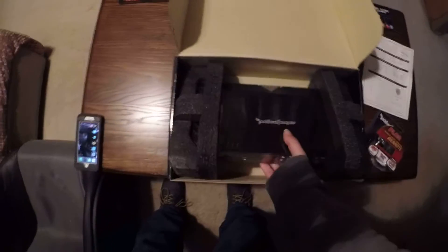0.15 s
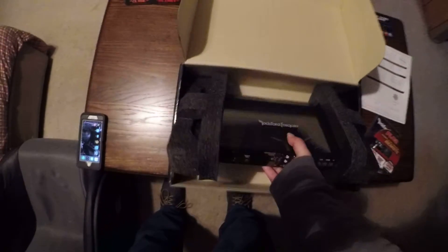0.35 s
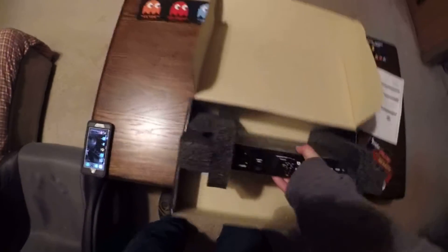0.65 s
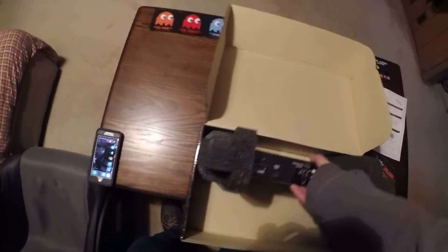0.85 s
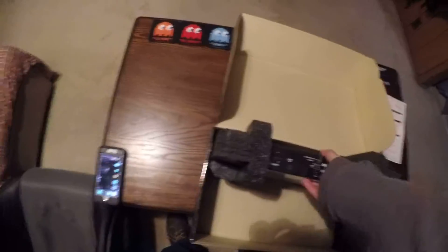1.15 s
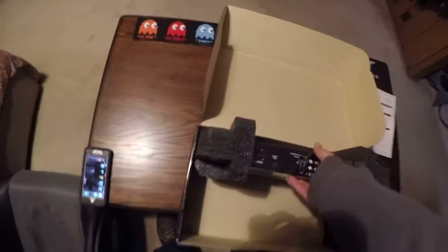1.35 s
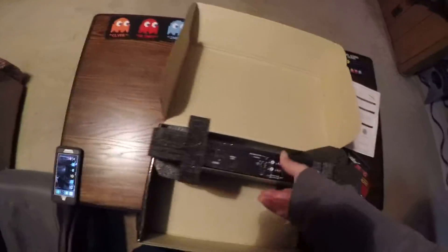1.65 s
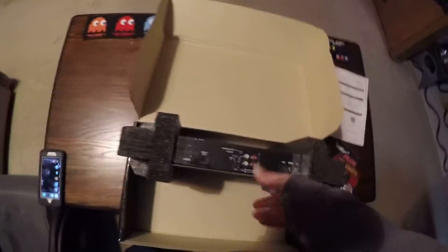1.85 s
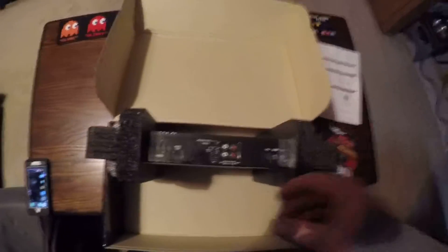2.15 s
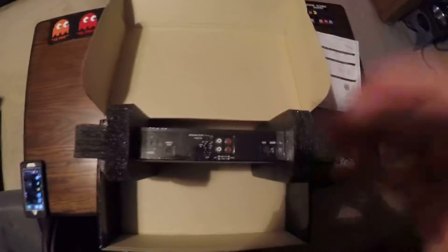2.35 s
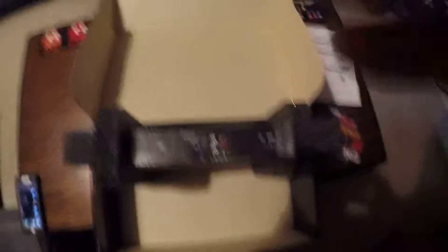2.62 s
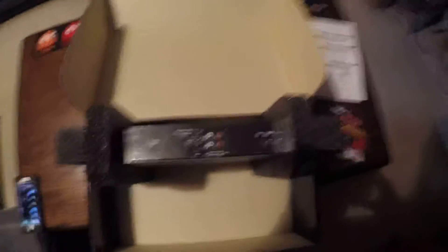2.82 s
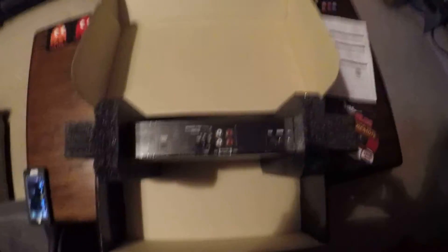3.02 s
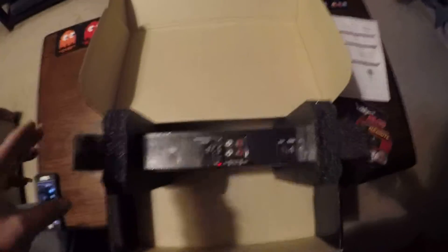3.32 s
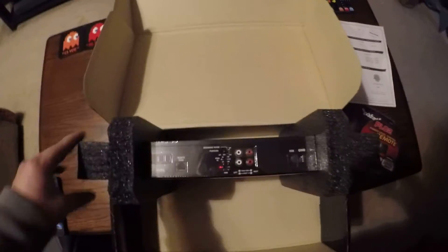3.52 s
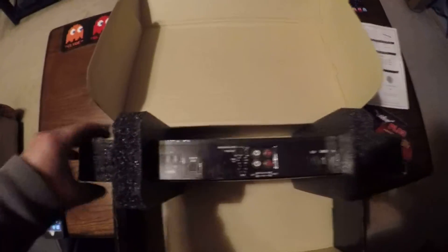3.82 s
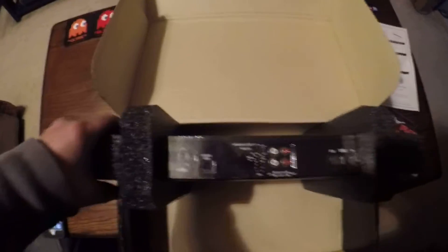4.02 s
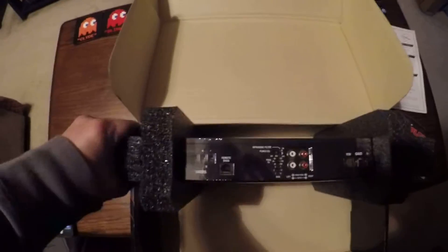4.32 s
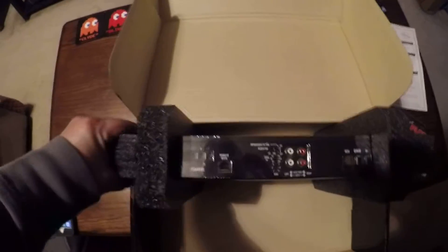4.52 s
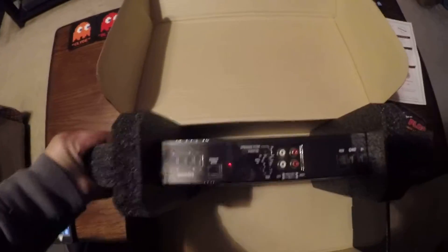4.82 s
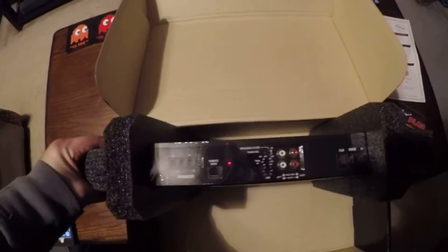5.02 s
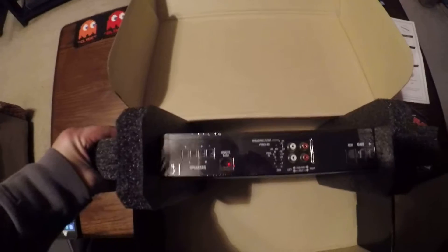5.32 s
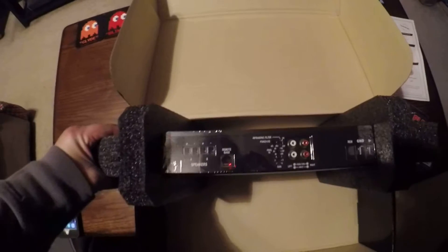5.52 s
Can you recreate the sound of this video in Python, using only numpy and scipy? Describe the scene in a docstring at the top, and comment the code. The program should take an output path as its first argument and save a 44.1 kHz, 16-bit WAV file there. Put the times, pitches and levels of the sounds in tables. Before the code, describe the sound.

Foam scrapes along a cardboard box, a heavy unit lands with dull thuds, loud knocks hit the camera, then foam softly crackles.

```python
"""A heavy metal unit in foam end caps is dragged out of a cardboard box and set down across its rim:
stick-slip trains, coloured as foam rub and resonated as cardboard panel, then thuds on box modes.
A hand adjusts the head-worn camera: skin slips on the case, each knock is a click, a push and a sway.
Then it slides over and grips one foam cap: fine grain, coarse crackle, single cells snapping.
Shaped noise makes the low rumble of a quiet room and the microphone hiss."""
import sys
import numpy as np
from scipy import signal
from scipy.fft import rfft, irfft
from scipy.io import wavfile
from scipy.ndimage import uniform_filter1d

SR = 44100
rng = np.random.default_rng(int(sys.argv[2]) if len(sys.argv) > 2 else 0)


def transcribe(signal):
    """Save signal, clipped to [-1, 1], as a 16-bit WAV file at the path in sys.argv[1]."""
    frames = np.atleast_2d(signal).T
    limited = np.clip(frames, -1, 1)
    pcm = np.round(limited * 32767).astype(np.int16)
    wavfile.write(sys.argv[1], SR, pcm)


N = 249768
TIME = np.arange(N) / SR

# squeezed foam spectrum: (frequency [Hz], relative density [dB])
GRIP_COLOUR = [(380, -53), (650, -19), (711, -14), (919, -9), (1420, -14.5), (1660, -10.5), (1840, -17),
               (2920, -6.5), (3880, -13.5), (5700, -7.5), (6910, -17.5), (10000, -23), (11400, -39),
               (14000, -45)]
# fingers knock the camera: (time [s], sway peak [dB], sway frequency [Hz], sway rise [s],
# push peak [dB], case click peak [dB])
KNOCKS = [(2.6065, -4.5, 49.3, 0.014, -20, -19.5), (2.696, -14, 42.3, .0023, -26, -27),
          (2.784, -11.5, 42.4, 0.014, -27, -45), (2.8135, -9.5, 49.4, 0.0034, -16.5, -45),
          (2.8455, -5, 56.7, 0.0041, -8.5, -26), (2.946, -7.5, 67, 0.0019, -18.5, -25),
          (3.0936, -7.5, 58.7, 0.0028, -15, -4), (3.129, -7, 49.5, 0.0029, -5.5, 0)]


def amp(db):
    """Decibels to gain."""
    return 10 ** (np.asarray(db) / 20)


def unit(x):
    """Scales to rms 1."""
    return x / np.sqrt(np.mean(x ** 2) + 1e-20)


def peaked(x):
    """Scales to peak 1."""
    return x / (abs(x).max() + 1e-20)


def level(rows, column=1):
    """Gain over time from one dB column of a curve, silent outside it."""
    columns = np.transpose(rows)
    return amp(np.interp(TIME, columns[0], columns[column], left=-120, right=-120))


def stroke(start_s, fastest_s, end_s, shape):
    """Gain over time of one rubbing movement: it gathers speed, then slows to rest."""
    speed = np.interp(TIME, [start_s, fastest_s, end_s], [0, 1, 0])
    return np.sin(np.pi / 2 * speed) ** shape


def swells(rows, shape):
    """Gain over time of even strokes (middle [s], length [s], level [dB]), added in power."""
    power = np.zeros(N)
    for middle_s, length_s, db in rows:
        gain = stroke(middle_s - length_s / 2, middle_s, middle_s + length_s / 2, shape)
        power += (amp(db) * gain) ** 2
    return np.sqrt(power)


def add(mix, start_s, sound):
    """Mixes a sound in at start_s."""
    part = mix[max(round(start_s * SR), 0):][:len(sound)]
    part += sound[:len(part)]


def colour(x, points):
    """Filters by a spectrum of (frequency [Hz], gain [dB]) points, joined on a log-frequency axis."""
    hz, db = np.transpose(points)
    bins_hz = np.fft.rfftfreq(len(x), 1 / SR)
    gain_db = np.interp(np.log(bins_hz + 1), np.log(hz + 1), db)
    return irfft(rfft(x) * amp(gain_db), len(x))


def resonate(x, modes):
    """Sum of steep resonances (frequency [Hz], half-width at -6 dB [Hz], gain [dB])."""
    out = np.zeros(len(x))
    for k, (hz, width_hz, db) in enumerate(modes):
        b, a = signal.iirpeak(hz, hz / (2 * width_hz), SR)
        twice = signal.lfilter(b, a, signal.lfilter(b, a, x))
        out += (-1) ** k * amp(db) * twice  # neighbours move in opposite directions
    return out


def struck(modes, t):
    """Sum of decaying sines (frequency [Hz], level [dB], t60 [s])."""
    return sum(amp(db - 60 * t / t60_s) * np.sin(2 * np.pi * hz * t) for hz, db, t60_s in modes)


def wander(rate_hz):
    """Slow random motion of rms 1: noise under a Gaussian low-pass."""
    bins_hz = np.fft.rfftfreq(N, 1 / SR)
    spectrum = rfft(rng.standard_normal(N)) * np.exp(-(bins_hz / rate_hz) ** 2)
    return unit(irfft(spectrum, N))


def slips(per_s, spread_db):
    """A train of tiny stick-slip releases of even mean power, a few much larger than the rest."""
    size = amp(spread_db * np.minimum(rng.exponential(1, N), 4))
    fires = rng.random(N) < per_s / SR
    train = rng.choice([-1, 1], N) * size * fires
    power = abs(uniform_filter1d(train ** 2, size=2000))
    return train / np.sqrt(power + 1e-6)


def rubbing(per_s, spread_db, judder_db, judder_hz):
    """Stick-slip friction whose level judders at random (judder_db rms)."""
    return slips(per_s, spread_db) * amp(judder_db * wander(judder_hz))


def drag(rub_trim_db=1.0, panel_trim_db=1.0, scuff_panel_db=1.5):
    """Foam cells catch and let go on the box wall; the same slips shake the cardboard panel."""
    # one long pull along the wall: (time [s], rub level [dB], panel level [dB]), before the trims
    pull = [(0.0, -45.5, -44.5), (0.124, -33, -39.5), (0.276, -42, -39.5), (0.346, -42, -38),
            (0.458, -33.5, -35.5), (0.564, -39.5, -37.5), (0.622, -35.5, -39), (0.746, -41, -41.5),
            (0.76, -43.5, -41), (0.81, -52.5, -55)]
    # once clear, the foam brushes the box: (middle [s], length [s], rub level [dB])
    short_scuffs = [(.832, .075, -41.5), (.895, 0.1, -44), (.96, .16, -52.5), (1.017, 0.055, -45),
                    (1.07, 0.11, -52.5), (1.19, 0.23, -58)]
    # foam rub spectrum: (frequency [Hz], relative density [dB])
    rub_colour = [(1120, -11.5), (1900, -7), (2110, -0.5), (2320, -4.5), (2730, -1), (4140, -8.5),
                  (4750, -2.5), (5500, -3.5), (5850, -5.5), (6770, -18.5), (7380, -17), (9740, -20.5),
                  (14000, -44.5), (15000, -45)]
    # rubbed cardboard: (frequency [Hz], half-width at -6 dB [Hz], relative gain [dB])
    panel_modes = [(124, 71, -5), (257, 135, 1), (412, 51, 2.5), (700, 150, 2), (900, 91, -8.5),
                   (1205, 227, 6), (1317, 215, -0.5), (1790, 100, -39)]
    friction = rubbing(per_s=9000, spread_db=1.5, judder_db=0.73, judder_hz=100)
    scuffs = swells(short_scuffs, shape=1.26)
    rub_gain = level(pull, column=1) * amp(rub_trim_db) + scuffs
    panel_gain = level(pull, column=2) * amp(panel_trim_db) + scuffs * amp(scuff_panel_db)
    rub = unit(colour(friction, rub_colour)) * rub_gain
    panel = unit(resonate(friction, panel_modes)) * panel_gain
    return rub + panel


def background(rumble_db=-33, swell_db=1.04, hiss_db=-61):
    """Low room rumble that swells a little, and steady microphone hiss."""
    # room rumble: (frequency [Hz], relative density [dB])
    rumble_colour = [(8.8, -9.5), (15, -2), (39, 1.5), (60, -6.5), (161, -20.5), (334, -25.5), (397, -25),
                     (491, -32.5), (524, -31.5), (692, -35), (934, -40), (1210, -41), (2500, -47.5),
                     (3250, -90), (5500, -120)]
    # microphone hiss: (frequency [Hz], relative density [dB])
    hiss_colour = [(1350, -44), (2300, -13), (2470, 0), (2690, 2.5), (3000, -0.5), (3080, 2.5), (3410, -3),
                   (3680, -4), (4310, -4), (5810, 0.5), (6590, 2), (7960, 2.5), (10700, -3), (15000, -22.5)]
    rumble = unit(colour(rng.standard_normal(N), rumble_colour))
    rumble = rumble * amp(swell_db * wander(rate_hz=17.0))
    hiss = unit(colour(rng.standard_normal(N), hiss_colour))
    return amp(rumble_db) * rumble + amp(hiss_db) * hiss


def landings(flap_db=-15, flap_s=0.013, scuff_db=-29, scuff_s=0.0025, damping_db_per_s=260):
    """Cushioned blows ring the box and flap its loose walls; each starts with a small scuff of foam."""
    # the unit lands on the rim: (time [s], thud peak [dB], contact time [s])
    blows = [(.949, -14.5, 0.003), (.957, -16, 0.0025), (0.9837, -12, 0.0019), (1.002, -21, 0.007),
             (1.012, -21.5, 0.0013)]
    # loaded box: (frequency [Hz], relative level [dB], t60 before the foam's damping [s])
    box_modes = [(98, -0.5, 0.32), (130, -9, 0.13), (164, -1.5, 0.14), (200.6, 4, 0.071), (304, -7, 0.097),
                 (417, 2.5, 0.23), (654, 3, 0.04), (730, -1, 0.017), (920, -13, .04)]
    flap_colour = [(40, -14), (120, 5), (400, -2), (800, -8), (1300, -32), (6000, -78)]
    scuff_colour = [(500, 6), (5000, -2), (10000, 2), (11000, -18), (15000, -33)]
    out, t = np.zeros(N), np.arange(SR // 2) / SR
    ring = struck(box_modes, t) * amp(-damping_db_per_s * t)  # the resting foam damps the box
    noises = rng.standard_normal((len(blows), len(t)))
    for (start_s, db, contact_s), noise in zip(blows, noises):
        push = t * np.exp(-2 * np.pi * t / contact_s)
        thud = peaked(signal.fftconvolve(push, ring)[:len(t)])
        flap = unit(colour(noise, flap_colour)) * np.exp(-t / flap_s)
        flap = flap * (1 - np.exp(-2 * t / contact_s))
        scuff = unit(colour(noise, scuff_colour)) * np.exp(-t / scuff_s)
        add(out, start_s, amp(db) * (thud + amp(flap_db) * flap + amp(scuff_db) * scuff))
    return out


def snaps(settle_s=0.0022, settle_db=-17, ring_width_hz=1800, ring_db=-2):
    """A cell wall buckles: a sharp release, its neighbours settling, rung at the cell's own pitch."""
    # loudest foam cells: (time [s], peak [dB], pitch [Hz])
    loud_cells = [(1.3274, -37, 5240), (1.5385, -29, 5800), (4.4939, -19, 3840), (4.5329, -26, 3430),
                  (4.669, -24, 4500), (4.7475, -27, 3050), (4.7906, -30, 5540), (4.8265, -22.5, 3100),
                  (4.858, -22, 5200), (4.906, -20, 3200), (4.970, -25.5, 4340), (5.058, -16.5, 5950),
                  (5.080, -17.5, 3000), (5.096, -21.5, 5900), (5.164, -24, 3030), (5.460, -32.5, 5100)]
    out, t = np.zeros(N), np.arange(-256, 1536) / SR
    cells = list(loud_cells) + ticks()
    noises = rng.standard_normal((len(cells), len(t)))
    for (snap_s, db, hz), noise in zip(cells, noises):
        settling = (t > 0) * amp(settle_db) * noise * np.exp(-abs(t) / settle_s)
        crack = colour((t == 0) + settling, GRIP_COLOUR)
        rung = crack + resonate(crack, [(hz, ring_width_hz, ring_db)])
        add(out, snap_s + t[0], amp(db) * peaked(rung))
    return out


def fingers(skid_rise_s=0.01, skid_fall_s=0.0027, skid_case_db=-17.5, skid_skin_db=-32.5, skid_growth=1.5):
    """Skin slips on the camera case, heard through the plastic: long strokes, a skid into each knock."""
    # strokes: (start [s], fastest [s], end [s], case level [dB], skin hiss level [dB]);
    # a row that ends before it starts is silent
    strokes = [(2.602, 2.614, 2.684, -32.5, -40), (2.675, 2.721, 2.836, -28.5, -37),
               (2.714, 2.75, 2.795, -23, -55), (2.77, 2.81, 2.825, -37.5, -49.5),
               (2.842, 2.848, 2.872, -35, -46.5), (2.853, 2.904, 2.964, -35, -47.5),
               (2.934, 2.949, 2.972, -38.5, -48.5), (2.955, 3.085, 2.9, -44, -55.5)]
    # camera case: (frequency [Hz], half-width at -6 dB [Hz], relative gain [dB])
    case_resonances = [(202, 203, 2.5), (470, 210, -1), (720, 256, 1.5), (1125, 123, 5.5), (1240, 193, 5.5),
                       (1660, 450, -4.5), (1996, 350, -4.5)]
    # skin hiss: (frequency [Hz], relative density [dB])
    skin_colour = [(1410, -7), (2400, 7), (2760, 7.5), (3240, 7), (4170, 1.5), (6070, 2.5), (7300, -6),
                   (9760, -10.5), (15000, -41)]
    friction = rubbing(per_s=4100, spread_db=1.0, judder_db=1.5, judder_hz=66)
    case_gain, skin_gain = np.zeros(N), np.zeros(N)
    for start_s, fastest_s, end_s, case_db, skin_db in strokes:
        speed = stroke(start_s, fastest_s, end_s, shape=2.26)
        case_gain = np.hypot(case_gain, amp(case_db) * speed)
        skin_gain = np.hypot(skin_gain, amp(skin_db) * speed)
    for knock_s, *_, click_db in KNOCKS:
        decay = np.maximum((knock_s - TIME) / skid_rise_s, (TIME - knock_s) / skid_fall_s)
        skid = amp(skid_growth * click_db) * np.exp(-decay)  # gentle knocks hardly skid
        case_gain = np.hypot(case_gain, amp(skid_case_db) * skid)
        skin_gain = np.hypot(skin_gain, amp(skid_skin_db) * skid)
    case = unit(resonate(friction, case_resonances)) * case_gain
    skin = unit(colour(friction, skin_colour)) * skin_gain
    return case + skin


def knocks(push_hz=115, stiff_hz=330, soften_s=0.0021, push_s=0.0023, touch_s=0.00004,
           sway_t60_s=0.072, sway_t60_per_rise=3.9):
    """Each knock clicks the case, shoves it, and leaves the camera swaying on its mount."""
    # struck camera case: (frequency [Hz], relative level [dB], t60 [s])
    case_modes = [(496, 2, 0.013), (800, 4.5, 0.0089), (1020, 8, 0.01), (1410, -15, 0.0055),
                  (2210, -19, 0.0065), (3200, -39, 0.002), (5100, -11, 0.00077)]
    # fingertip dulling the click: (frequency [Hz], gain [dB])
    click_colour = [(3000, 11), (6000, -16), (9000, -9), (14000, -20)]
    out, t = np.zeros(N), np.arange(SR // 4) / SR
    push_rate_hz = push_hz + stiff_hz * np.exp(-t / soften_s)  # drops as the contact gives way
    turns = np.cumsum(push_rate_hz) / SR
    push = peaked(np.sin(2 * np.pi * turns) * t * np.exp(-t / push_s))
    ring = struck(case_modes, t) * (1 - np.exp(-t / touch_s))
    click = peaked(colour(ring, click_colour) * (t < t[-1] / 2))  # cuts the filter's wrap-around
    for start_s, sway_db, hz, rise_s, push_db, click_db in KNOCKS:
        t60_s = sway_t60_s + sway_t60_per_rise * rise_s  # a slower shove sways longer
        swing = np.sin(2 * np.pi * hz * t) * (1 - np.exp(-t / rise_s)) ** 2
        sway = peaked(swing * amp(-60 * t / t60_s))
        add(out, start_s, amp(sway_db) * sway + amp(push_db) * push + amp(click_db) * click)
    return out


def slide(trim_db=0.46, bright_db=-2):
    """Skin gliding over foam: a fine, even grain that brightens when the fingers move fast."""
    # fingers slide into place on the cap: (time [s], level before trim and brightening [dB])
    glide = [(3.6, -75), (3.642, -52), (3.718, -70), (3.782, -43), (3.838, -49.5), (3.944, -45),
             (4.022, -51.5), (4.124, -49), (4.258, -58), (4.274, -50.5), (4.34, -70)]
    # grain spectrum: (frequency [Hz], relative density [dB])
    grain_colour = [(380, -25), (650, -10), (725, -3), (861, -9), (1130, -13), (1240, -9), (1370, -17),
                    (1620, -7), (1880, -13), (2880, -3), (3810, -13.5), (4930, -5), (6360, -18.5),
                    (10200, -30.5), (12000, -40), (15600, -70), (22000, -120)]
    # layer added by a fast slide: (frequency [Hz], gain before bright_db [dB])
    bright_colour = [(2500, -20), (4000, -11), (5500, 2), (7000, 3), (12000, 5)]
    friction = rubbing(per_s=9400, spread_db=4.0, judder_db=1.5, judder_hz=110)
    grain = unit(colour(friction, grain_colour))
    gain = level(glide)
    bright = amp(bright_db) * peaked(gain) ** 2 * colour(grain, bright_colour)
    return (grain + bright) * gain * amp(trim_db)


def grip():
    """Squeezed foam gives way cell by cell: a coarse crackle."""
    # squeezes of the cap: (time of greatest force [s], length [s], level [dB])
    squeezes = [(4.7, 1, -54.5), (4.89, 0.24, -42.5), (5.075, 0.14, -44)]
    friction = rubbing(per_s=3000, spread_db=4.0, judder_db=3.0, judder_hz=74)
    return unit(colour(friction, GRIP_COLOUR)) * swells(squeezes, shape=1.25)


def ticks(per_s=40, spread_db=5, pitch_hz=5260):
    """Strained foam ticks: small snaps (time [s], peak [dB], pitch [Hz]) at uneven intervals."""
    # spells of strain: (start [s], end [s], middle of the peak range [dB])
    strained = [(4.551, 5.05, -37), (5.358, 5.43, -40)]
    rows = []
    for start_s, end_s, db in strained:
        times = np.arange(start_s, end_s, 1 / per_s)
        for slot_s, (late, size) in zip(times, rng.random((len(times), 2))):
            rows.append((slot_s + late / per_s, db + spread_db * (2 * size - 1), pitch_hz))
    return rows


def room(x, wet_db=-14, t60_s=0.32):
    """Short dull reverberation of a carpeted room: coloured noise whose decay t60_s sets."""
    t = np.arange(SR // 2) / SR
    tail = colour(rng.standard_normal(len(t)), [(400, 0), (4000, -16), (12000, -9.0)])
    tail = tail * amp(-60 * t / t60_s) * (t > 0.005)
    return x + amp(wet_db) * signal.fftconvolve(x, tail / np.linalg.norm(tail))[:N]


def scene():
    """Foam and box sound through the room; touches on the camera reach the microphone directly."""
    foam_and_box = drag() + landings() + slide() + grip() + snaps()
    return (room(foam_and_box) + knocks() + fingers() + background())[None]


def record(dry, ceiling=0.79, edge_hz=15200):
    """The microphone rounds off the hardest knocks and loses the top treble; then the band limit."""
    # microphone response: (frequency [Hz], gain [dB])
    response = [(20, 0.5), (11000, 0), (14000, 2.5), (15200, -3)]
    rounded = dry[0] / (1 + (dry[0] / ceiling) ** 4) ** (1 / 4)
    band = signal.firwin(511, edge_hz, window=("kaiser", 9), fs=SR)
    return signal.oaconvolve(colour(rounded, response), band, "same")[None]


dry = scene()
out = record(dry)
transcribe(out)
```